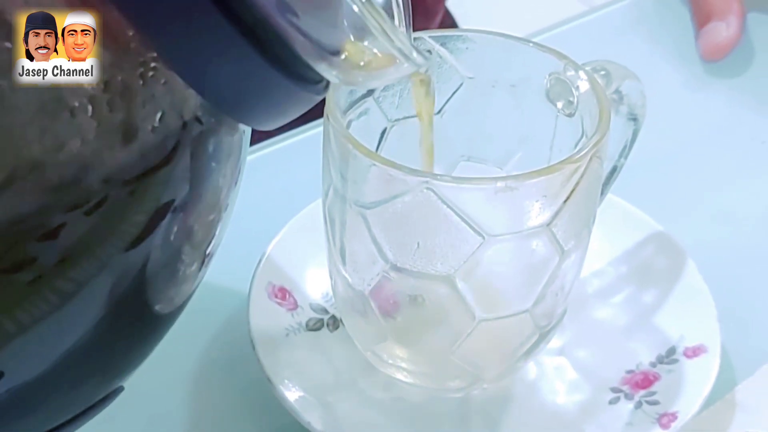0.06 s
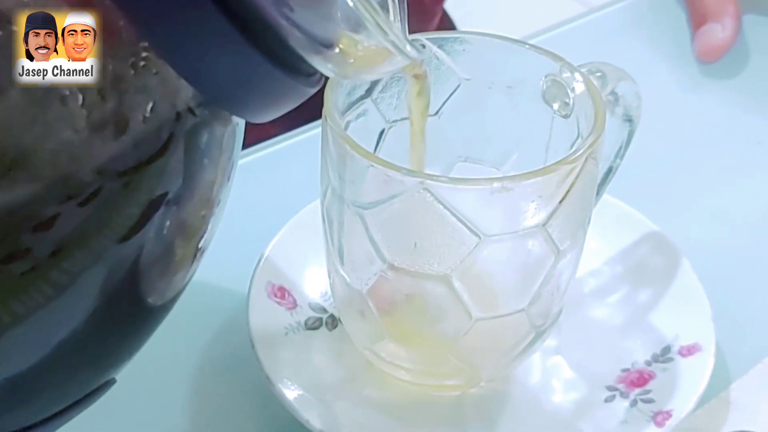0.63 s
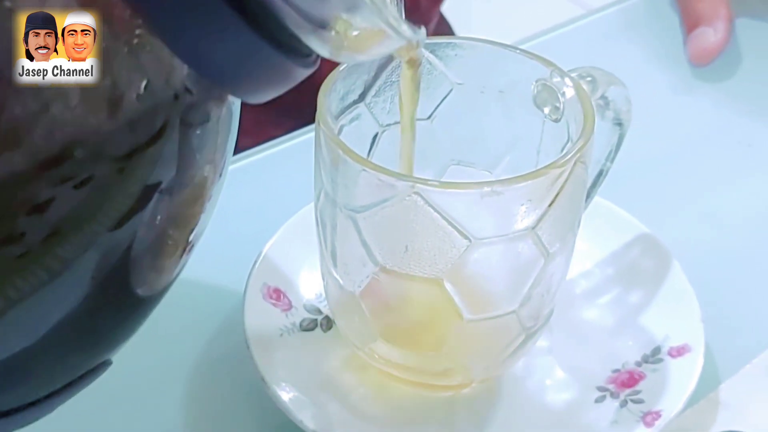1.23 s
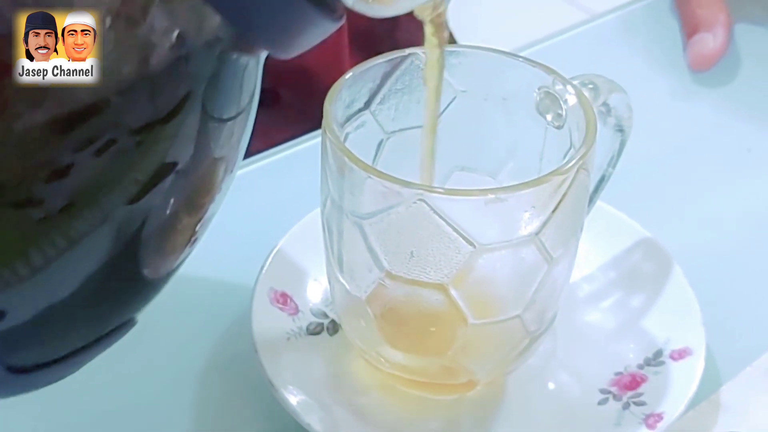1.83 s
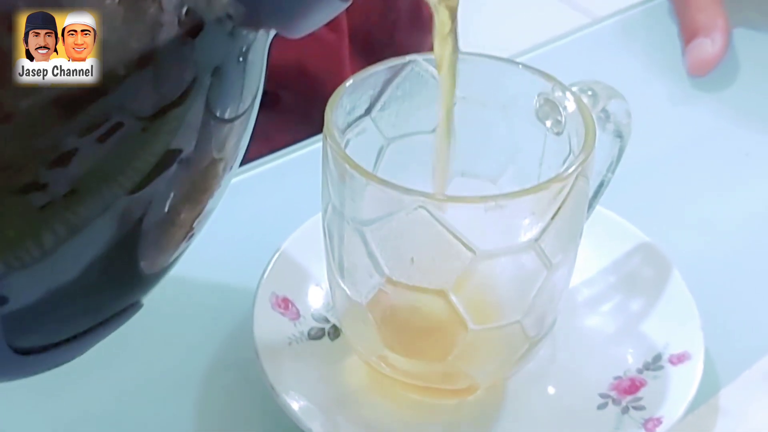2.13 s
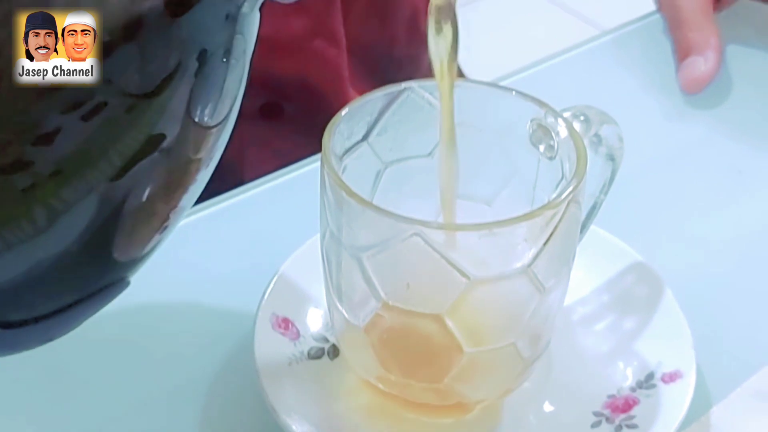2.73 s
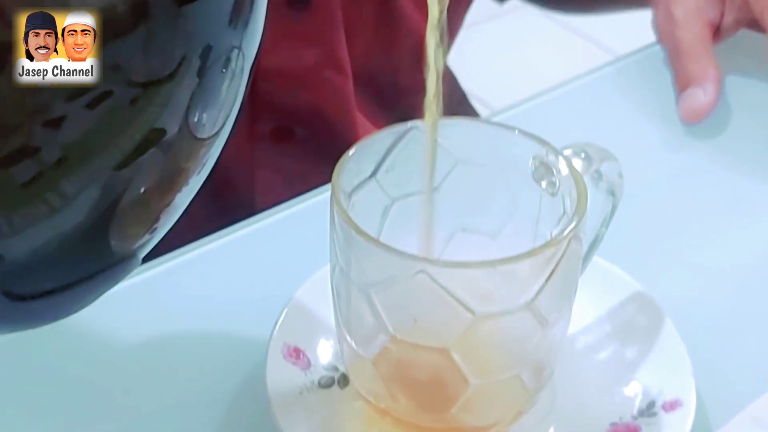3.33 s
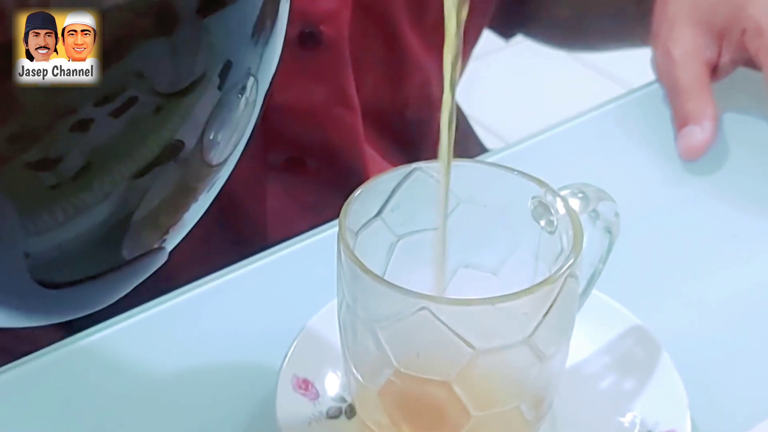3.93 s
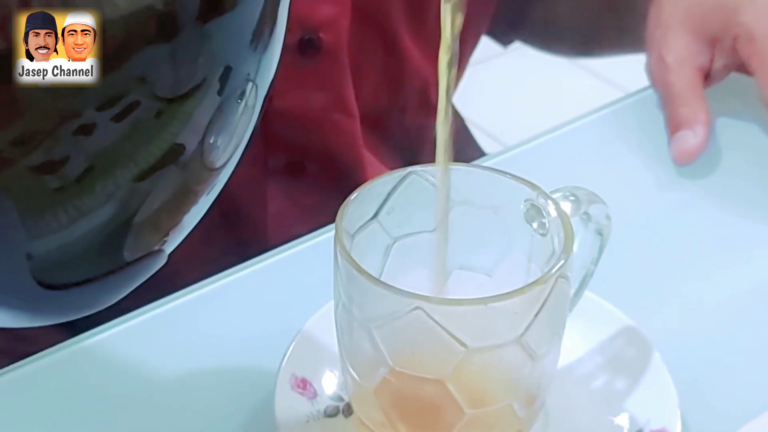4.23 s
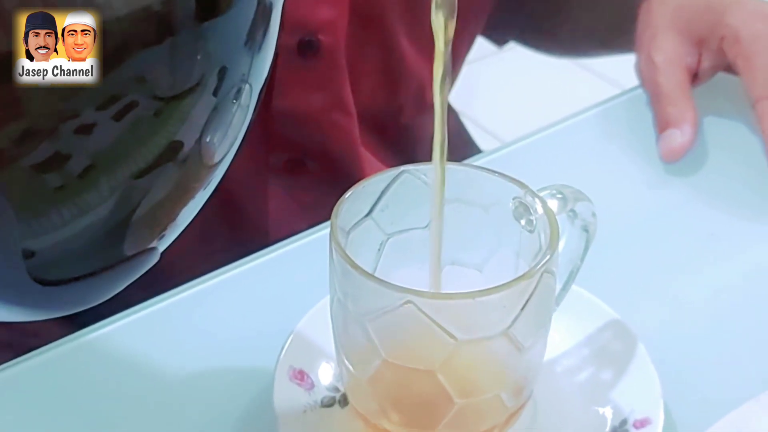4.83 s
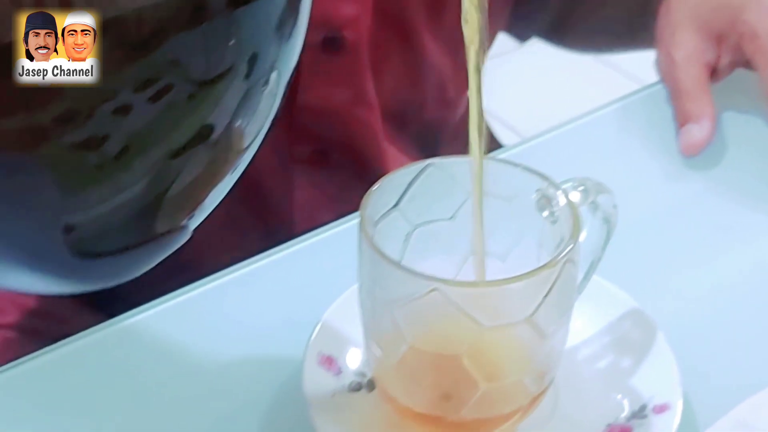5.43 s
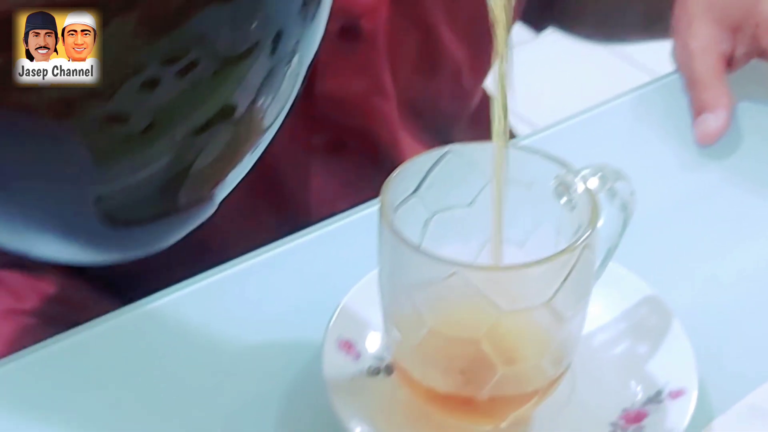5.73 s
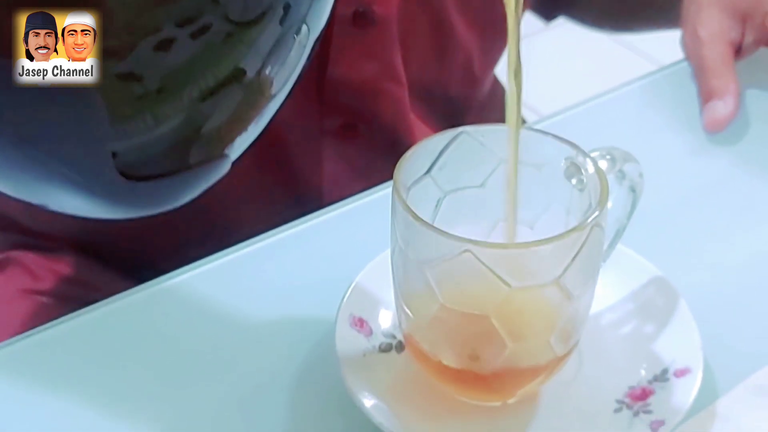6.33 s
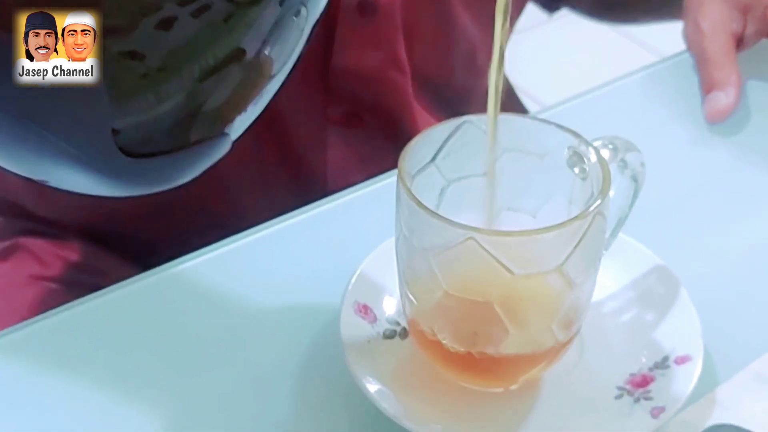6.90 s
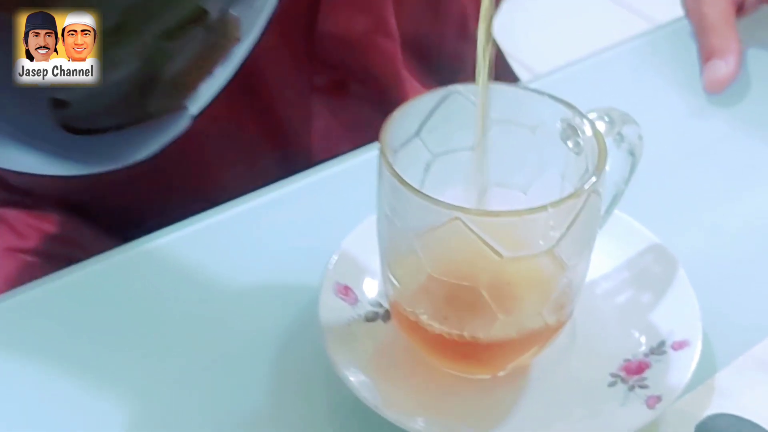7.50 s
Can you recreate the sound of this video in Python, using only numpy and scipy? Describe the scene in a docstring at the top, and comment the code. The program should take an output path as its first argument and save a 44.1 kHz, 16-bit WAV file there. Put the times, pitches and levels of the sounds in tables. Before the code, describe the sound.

A kitchen hums softly under a faint high hiss. Tea slips from a pot into a glass mug in a few faint trickles. After about two and a half seconds the thin stream plunges in harder, plopping and gurgling, a little deeper as the mug fills. Fine spray fizzes and droplets tick on the glass. The pour continues to the end, heard from close by with slight room reverberation.

```python
"""A kitchen hums and rumbles softly under a faint, high background hiss; then tea slides from a pot into
a glass mug in a few faint trickles. As the pot is lifted the thin stream plunges and entrains air. Each
bubble is a damped oscillator, its air the spring and the tea around it the mass: single ones plop, swarms
gurgle, deeper as the mug fills. Spray fizzes and flung droplets tick on the glass. Hollow resonances,
echoes and reverberation carry the pour to the two microphones of a phone close by."""
import sys
import numpy as np
from scipy import signal
from scipy.fft import rfft, irfft, next_fast_len
from scipy.io import wavfile
from scipy.ndimage import uniform_filter1d

SR = 44100
rng = np.random.default_rng(int(sys.argv[2]) if len(sys.argv) > 2 else 0)


def master_out(mix):
    """Clip the mix to full scale and print it as 16-bit PCM to the path in sys.argv[1]."""
    frames = np.transpose(np.atleast_2d(mix))
    ceiling = np.clip(frames, -1, 1)
    pcm = np.round(ceiling * 32767).astype(np.int16)
    wavfile.write(sys.argv[1], SR, pcm)


N = 337806
TIME = np.arange(N) / SR


def gain_of(db):
    """Amplitude ratio of a level in decibels."""
    return 10 ** (np.asarray(db) / 20)


def unit_rms(x):
    """Normalisation to an rms of one."""
    return x / np.sqrt(np.mean(x ** 2) + 1e-20)


def at_frequency(points, hz):
    """Interpolation of a spectrum on a logarithmic frequency axis."""
    f, value = np.transpose(points)
    return np.interp(np.log(hz + 1), np.log(f + 1), value)


def at_time(rows, s, column=1):
    """Linear interpolation of one column of a table at the times s."""
    rows = np.array(rows)
    return np.interp(s, rows[:, 0], rows[:, column])


def add(mix, s, sound):
    """Superposition: the sound joins the mix at time s."""
    part = mix[..., max(round(s * SR), 0):][..., :sound.shape[-1]]
    part += sound[..., :part.shape[-1]]


def colour(x, spectrum, size=2048):
    """Minimum-phase filtering by (f/Hz, gain/dB) points; causality keeps attacks sharp."""
    log_gain = np.log(gain_of(at_frequency(spectrum, abs(np.fft.fftfreq(size, 1 / SR)))))
    taps = np.fft.ifft(np.exp(np.conj(signal.hilbert(log_gain)))).real
    return signal.oaconvolve(x, taps)[:len(x)]


def drift(per_s):
    """Random modulation: straight lines between Gaussian values of unit variance."""
    knots = rng.standard_normal(4096)
    return np.interp(TIME * per_s, np.arange(len(knots)), knots)


# coherence of the two microphones: f/Hz, coherence (0 to 1)
COHERENCE = [(60, 1), (260, 0.67), (520, 0), (1000, 0), (2500, 0)]
def diffuse_field(length):
    """Diffuse noise is coherent at two points only for long waves; returns f/Hz and both spectra."""
    hz = np.fft.rfftfreq(length, 1 / SR)
    right, independent = rfft(rng.standard_normal((2, length)))
    shared = np.clip(at_frequency(COHERENCE, hz), 0, 1)
    left = shared * right + np.sqrt(1 - shared ** 2) * independent
    return hz, np.array([left, right])


# background noise in each channel: f/Hz, relative spectral density/dB
NOISE_LEFT = [(20, -3.5), (55, 2), (100, 6), (200, 1.5), (400, -12), (680, -13), (900, -30), (1500, -36),
              (2500, -33.5), (3600, -43), (6000, -29.5), (8500, -21), (10000, -22.5)]
NOISE_RIGHT = [(20, -28), (55, -2.5), (100, -3.5), (200, -6.5), (400, -14.5), (680, -19.5), (900, -32),
               (1500, -38), (2500, -44.5), (3600, -53.5), (6000, -41.5), (8000, -41), (10000, -53)]
# treble hiss, which dips early in the pour: t/s, relative level/dB
HISS_LEVEL = [(0, 1.5), (1.1, -1), (2.3, -1), (2.7, 0.5), (7.66, 2.5)]
def background(left_db=-62, right_db=-58.5, waver_db=2.04, treble_hz=4000):
    """Noise floor: the room's low rumble under a faint, high background hiss, wavering together."""
    hz, spectra = diffuse_field(next_fast_len(N))
    spectra = spectra * gain_of([at_frequency(NOISE_LEFT, hz), at_frequency(NOISE_RIGHT, hz)])
    rumble = irfft(spectra * (hz < treble_hz))[:, :N]
    hiss = irfft(spectra * (hz >= treble_hz))[:, :N]
    left, right = rumble + hiss * gain_of(at_time(HISS_LEVEL, TIME))
    noise = np.array([gain_of(left_db) * unit_rms(left), gain_of(right_db) * unit_rms(right)])
    return noise * gain_of(waver_db * drift(48))


# partials of an appliance's motor: f/Hz, level/dB
MOTOR_PARTIALS = [(96.9, -64.5), (145.3, -67.5), (172.3, -74), (216, -73), (269.2, -76.5), (292, -76.5),
                  (445, -80.5), (1050, -88.5)]
def motor_hum(waver_db=4, wander_rad=0.34):
    """A motor radiates a line spectrum, each line modulated at random in amplitude and phase."""
    tones = np.zeros(N)
    for hz, db in MOTOR_PARTIALS:
        amplitude = np.sqrt(2) * gain_of(db + waver_db * drift(10))
        tones += amplitude * np.sin(2 * np.pi * hz * TIME + wander_rad * drift(5.9))
    return tones


def bubble(hz, cycles, rise):
    """Damped oscillation of trapped air, decaying by 1/e in `cycles`; pitch rises near the surface."""
    turns = np.arange(int(7 * cycles / hz * SR) + 8) * hz / SR
    attack_cycles = 0.23 + 0.14 * min(cycles, 10)  # clearer bubbles start more softly
    envelope = (1 - np.exp(-turns / attack_cycles)) * np.exp(-turns / cycles)
    return envelope / envelope.max() * np.sin(2 * np.pi * turns * (1 + rise * turns / cycles))


# runs of tiny bubbles: t/s, duration/s, level/dB, f/Hz
TRICKLE_RUNS = [(0.85, 0.25, -77, 1800), (1.271, 0.28, -70.5, 718), (1.505, 0.38, -74, 880),
                (1.399, 1.23, -78.5, 2500), (1.826, 0.21, -71.5, 1570), (2.023, 0.083, -66, 577),
                (2.175, 0.22, -71, 1160), (2.436, 0.12, -65.5, 867), (2.909, 0.094, -59.5, 2570)]
def trickles(octaves=0.17, cycles=4, spread_db=6, rise=0.0049, count=60):
    """Gentle entrainment: bubbles of like size ring at like pitch, in runs that swell and fade."""
    out = np.zeros(N)
    for start, length, level_db, centre_hz in TRICKLE_RUNS:
        run = np.zeros(round(length * SR))
        for when, size, strength in rng.random((count, 3)):
            hz = centre_hz * 2 ** (octaves * (2 * size - 1))
            add(run, when * length, gain_of(spread_db * strength) * bubble(hz, cycles, rise))
        swell = np.sin(np.linspace(0, np.pi, len(run)))
        add(out, start, gain_of(level_db) * unit_rms(run * swell))
    return out


# prominent bubbles, nominal values: t/s, level/dB, f/Hz, decay/cycles, splash level/dB
PLOPS = [(1.6659, -48.5, 2560, 5.7, -61), (1.745, -45.5, 935, 1.3, -57), (1.8938, -50.5, 1590, 4.7, -51),
         (2.149, -50.5, 984, 6.7, -72), (2.4411, -37.5, 952, 4.2, -54), (2.471, -50.5, 1080, 1.9, -48),
         (2.7224, -40, 604, 1.8, -78), (2.8101, -42, 530, 6.2, -75), (2.8912, -32, 529, 4.5, -53),
         (3.035, -34.5, 680, 1.34, -53), (3.113, -31.5, 445.5, 5.7, -63), (3.1655, -33, 425, 3.1, -48.5),
         (3.226, -32, 490, 0.89, -56), (3.2612, -33, 2480, 2.9, -43), (3.291, -36.5, 507, 1.4, -70),
         (3.3051, -32, 2180, 0.97, -43), (3.3287, -20.5, 484, 1.35, -50), (3.349, -32.5, 467, 5.1, -70),
         (3.3778, -22.5, 2700, 2.7, -44), (3.4204, -27.5, 483, 2, -44), (3.4252, -40, 995, 4.5, -62),
         (3.4835, -38, 470, 2.2, -61), (3.512, -22, 527, 1.24, -40.5), (3.553, -33.5, 527, 2.7, -50),
         (3.5735, -33.5, 563, 2.8, -66), (3.6605, -30, 481, 4.3, -30), (3.7205, -32, 536, 1.7, -37.5),
         (3.77, -36.5, 475, 1.8, -54), (3.8295, -29, 438, 7, -42), (3.8812, -40, 1190, 5.8, -34),
         (3.908, -38.5, 1860, 19, -42), (3.9234, -24.5, 645, 0.55, -54), (3.945, -37, 504, 1.5, -34.5),
         (4.004, -35.5, 353, 2.5, -43.5), (4.112, -36.5, 351, 2.7, -43.5), (4.167, -30, 544, 0.83, -44.5),
         (4.203, -34.5, 354, 2.2, -57.5), (4.208, -29.5, 2600, 2.8, -47), (4.2539, -17.5, 800, 0.48, -34),
         (4.3195, -38, 1580, 15, -36.5), (4.3205, -32.5, 494, 3.3, -62), (4.351, -30, 2510, 2.5, -44),
         (4.41, -36, 304, 2, -45.5), (4.4535, -31.5, 621, 3.6, -46), (4.455, -29.5, 2160, 3.7, -58),
         (4.467, -29.5, 2160, 3.3, -61), (4.5514, -28.5, 276, 2.7, -38.5), (4.552, -28, 552, 3.8, -56),
         (4.5545, -33.5, 2300, 5.2, -55), (4.606, -39.5, 1290, 2.4, -49), (4.61, -51, 1773, 69, -72),
         (4.622, -28, 576, 1.6, -39), (4.623, -31, 318, 5, -67), (4.683, -41, 2470, 5, -60),
         (4.6992, -23, 524, 2.2, -61), (4.7255, -30.5, 510, 1.9, -61), (4.7643, -31.5, 563, 6, -57),
         (4.808, -26.5, 648, 3.2, -31.5), (4.9005, -22.5, 342, 3, -41), (4.901, -23.5, 604, 1.4, -49),
         (4.9235, -27.5, 580, 1.45, -63), (4.993, -37, 1350, 3.2, -55), (5.057, -29, 340, 4.4, -36),
         (5.0927, -39.5, 2870, 12, -41), (5.097, -34, 488, 3.9, -60), (5.116, -35, 338, 2.8, -50),
         (5.133, -32, 580, 5.4, -62), (5.137, -42, 1870, 24, -63), (5.179, -34, 820, 5, -44),
         (5.2, -37, 1040, 4.8, -37), (5.205, -43, 2860, 8, -50), (5.2467, -31, 2580, 1.3, -36.5),
         (5.2963, -29, 348, 1.9, -68), (5.3315, -28.5, 590, 3.2, -34.5), (5.3635, -25.5, 548, 1.6, -43),
         (5.435, -49, 1230, 2.3, -37), (5.4775, -38, 2480, 0.58, -36.5), (5.538, -35, 285, 2.3, -56),
         (5.636, -36, 640, 5.8, -71), (5.666, -33.5, 474, 2.3, -59), (5.705, -50, 2750, 9, -68),
         (5.7067, -34, 1057, 4.9, -63), (5.7492, -23, 584, 1.1, -43.5), (5.774, -28.5, 510, 0.98, -45),
         (6.0369, -30, 566, 1.24, -43.5), (6.1142, -25.5, 587, 3.7, -49), (6.12, -28, 358, 2.4, -61.5),
         (6.1435, -25, 440, 0.82, -57), (6.213, -33, 2650, 8.1, -68), (6.2358, -26, 286, 1.6, -42),
         (6.244, -23, 680, 2.1, -54), (6.257, -26.5, 300, 1.6, -60), (6.2875, -35.5, 660, 1.5, -39),
         (6.314, -46, 277, 1.6, -57), (6.333, -39, 2490, 1.3, -37.5), (6.399, -29.5, 700, 0.88, -58),
         (6.3993, -25, 346, 2.6, -41), (6.4062, -29.5, 2610, 5.7, -54), (6.422, -27.5, 590, 1.1, -39),
         (6.578, -37, 2700, 1.8, -40), (6.603, -31.5, 844, 0.86, -59), (6.671, -37.5, 258, 1.8, -61.5),
         (6.759, -35, 262, 1.7, -50), (6.8283, -36, 250, 3.9, -74), (6.88, -38, 625, 5.7, -48),
         (6.897, -38, 1240, 1.1, -42.5), (6.94, -35, 351, 8.4, -42.5), (7.0155, -32, 635, 10, -35.5),
         (7.04, -38, 603, 18, -63), (7.112, -33.5, 255, 3.1, -67), (7.1605, -27, 1410, 0.76, -27),
         (7.164, -24, 289, 1.54, -54), (7.2098, -25.5, 293, 2.1, -36), (7.284, -34.5, 710, 3.5, -64),
         (7.306, -32.5, 1178, 2.8, -49), (7.307, -27.5, 687, 2.6, -59), (7.3165, -33.5, 2410, 6.7, -51),
         (7.3452, -32, 1220, 2.1, -39), (7.3646, -28, 650, 1.9, -47), (7.388, -31, 247, 2.3, -57),
         (7.4383, -35.5, 2760, 7.8, -53), (7.4695, -24.5, 272, 1.7, -52), (7.541, -31.5, 638, 5.8, -66),
         (7.5713, -23.5, 670, 3.5, -32), (7.572, -28, 1260, 5.1, -54), (7.603, -33.5, 296, 2.7, -39),
         (7.629, -28.5, 580, 2.4, -51)]
# pitch of a typical large bubble, falling as the stream plunges deeper: t/s, f/Hz
PLUNGE_PITCH = [(1.3, 624), (2.7, 583), (3.2, 479), (4.2, 449), (4.7, 447), (7.66, 387.5)]
# strength of the second bubble: f/Hz of the first, relative level/dB
SECOND_LEVEL = [(300, -10), (600, -9), (1200, -16.5)]
def plops(low_db=-2.0, high_db=1, decay_scale=0.76, rise=0.011, chirp=0.026, second_delay_s=0.00819):
    """Bubble resonance: small ones ring high and chirp; the cavity under each closes on a deep second."""
    out = np.zeros(N)
    for s, db, hz, cycles, _ in PLOPS:
        smallness = at_frequency([(500, 0.0088), (1500, 1)], hz)
        glide = rise + smallness * (chirp - rise)
        first = bubble(hz / (1 + glide), decay_scale * cycles, glide)
        second = bubble(at_time(PLUNGE_PITCH, s), cycles=1.19, rise=rise)
        add(out, s, gain_of(db + low_db + smallness * (high_db - low_db)) * first)
        add(out, s + second_delay_s, gain_of(db + at_frequency(SECOND_LEVEL, hz)) * second)
    return out


# spectrum of a liquid tick: f/Hz, gain/dB
TICK_SPECTRUM = [(900, -20.5), (1800, -1), (2700, 1), (3600, -12), (4800, -5), (6200, -0.5), (8300, -13.5),
                 (10000, -28)]
# small bubbles broken off by a splash: f/Hz, level/dB re the splash, decay/cycles
FRAGMENTS = [(1158, -6.5, 1.13), (2323, -3, 2.7)]
def splashes(snap_db=-14, snap_s=0.0032, crackle_db=-3.5, crackle_s=0.012, octaves=0.19, lag_s=0.0035):
    """Cavity collapse: the surface slaps shut over each plop, snaps, crackles and sheds small bubbles."""
    snaps, crackle, pips = np.zeros((3, N))
    t = np.arange(1024) / SR
    for s, _, _, _, splash_db in PLOPS:
        noise = gain_of(splash_db) * rng.standard_normal(len(t))
        add(snaps, s, gain_of(snap_db) * noise * np.exp(-t / snap_s))
        add(crackle, s, gain_of(crackle_db) * noise * np.exp(-t / crackle_s))
        for hz, db, cycles in FRAGMENTS * 2:  # two of each kind
            size, late = rng.random(2)
            pip = bubble(hz * 2 ** (octaves * (2 * size - 1)), cycles, rise=0.036)
            add(pips, s + lag_s * late ** 2, gain_of(splash_db + db) * pip)
    crackle_band = signal.butter(4, [800, 3100], "band", fs=SR, output="sos")
    return pips + colour(snaps, TICK_SPECTRUM) + signal.sosfilt(crackle_band, crackle)


# churning, in relative levels: t/s, large bubbles/dB, smaller bubbles/dB, spray/dB
CHURN_LEVELS = [(2.4, -51, -70, -84), (2.71, -54.5, -77, -85), (3.34, -45.5, -65.5, -56.5),
                (4.05, -45, -65, -63), (4.83, -44.5, -67.5, -67), (5.26, -42, -64, -70),
                (5.51, -45.5, -63.5, -66), (6.05, -48, -68.5, -75.5), (6.27, -44, -62, -70.5),
                (6.41, -47, -66.5, -69), (6.66, -48.5, -74, -71), (6.88, -46, -67.5, -70.5),
                (7.1, -41.5, -59, -69.5), (7.66, -43.5, -63, -66)]
LARGE, SMALLER, SPRAY = 1, 2, 3
PLUNGE_START_S = CHURN_LEVELS[0][0]
def churn(column, onset_s=0.3):
    """Amplitude envelope of one kind of churning, which sets in as the stream begins to plunge."""
    onset = np.clip((TIME - PLUNGE_START_S) / onset_s, 0, 1)
    return gain_of(at_time(CHURN_LEVELS, TIME, column)) * onset


def swarm(pitch, octaves, cycles, spread_db, count, column):
    """Incoherent sum of bubbles scattered about pitch (t/s, f/Hz) by octaves (t/s, half-width/octaves)."""
    out = np.zeros(N)
    for k, (when, size, strength, life) in enumerate(rng.random((count, 4))):
        s = (k + 2 * when) / count * N / SR
        hz = at_time(pitch, s) * 2 ** (at_time(octaves, s) * (2 * size - 1))
        add(out, s, gain_of(spread_db * strength ** 3) * bubble(hz, cycles * (.5 + life), rise=0.018))
    return unit_rms(out) * churn(column)


def gurgle(large_db=-4.0, medium_db=4.5, small_db=2.5):
    """A plunging jet entrains three sizes of bubble; in shallow tea the large ones are much alike."""
    widening = [(4.15, 0.18), (4.6, 0.78)]
    large = swarm(PLUNGE_PITCH, widening, cycles=2.3, spread_db=4.5, count=700, column=LARGE)
    medium = swarm([(0, 1068)], [(0, 0.51)], cycles=2.8, spread_db=14, count=1500, column=SMALLER)
    small = swarm([(0, 2100)], [(0, .48)], cycles=3.8, spread_db=12, count=2000, column=SMALLER)
    return gain_of(large_db) * large + gain_of(medium_db) * medium + gain_of(small_db) * small


def thud(db=-12, hz=125, growth_db_per_s=2.0):
    """Forced vibration: the stream drums on the mug's base and the table, more as the tea deepens."""
    drumming = swarm([(0, hz)], [(0, 0.3)], cycles=1.32, spread_db=10.0, count=400, column=LARGE)
    return gain_of(db + growth_db_per_s * (TIME - 5)) * drumming


def spray(ping_db=-4, fizz_db=-5.0, build_s=4.4, bursts_per_s=1800):
    """Shot noise: tiny bubbles ping and burst at the surface, a fizz that grows as froth gathers."""
    pings = swarm([(0, 5800)], [(0, .35)], cycles=4, spread_db=7, count=3200, column=SPRAY)
    bursts = rng.standard_normal(N) * (rng.random(N) < bursts_per_s / SR)
    fizz = unit_rms(colour(bursts, TICK_SPECTRUM)) * churn(SPRAY)
    froth = np.clip((TIME - PLUNGE_START_S) / build_s, 0, 1)
    return froth * (gain_of(ping_db) * pings + gain_of(fizz_db) * fizz)


def surge(settle_s=0.025, exponent=0.51, lull_s=0.016, lull_depth=0.081):
    """Amplitude modulation: churning lulls as a cavity opens, then swells as the plop drags bubbles in."""
    kicks = np.zeros(N)
    for s, db, hz, _, _ in PLOPS:
        add(kicks, s, gain_of([db]) * np.sqrt(hz))
    stir = signal.lfilter([1], [1, -np.exp(-1 / (settle_s * SR))], kicks)
    # run backwards in time, the decay becomes a rise ahead of each plop
    opening = signal.lfilter([1], [1, -np.exp(-1 / (lull_s * SR))], kicks[::-1])[::-1]
    mean_stir = uniform_filter1d(stir, size=SR // 3) + 1e-3
    return (0.33 + 0.65 * stir / mean_stir) ** exponent / (1 + lull_depth * opening / mean_stir)


# droplets striking the glass: t/s, relative level/dB, brightness/dB
IMPACTS = [(2.4413, -56, 5.5), (2.987, -52.5, 7.5), (3.377, -38.5, 6), (3.742, -50.5, -12),
           (3.783, -47, -7), (3.945, -37, -14), (3.975, -41, -10), (4.005, -41.5, 3), (4.112, -44, 0),
           (4.1383, -39.5, -16), (4.1656, -45, -18), (4.204, -34, -11), (4.309, -47, -1.5),
           (4.409, -48.5, -1), (4.486, -42, -6), (4.541, -52, 4), (4.653, -50.5, 4.5), (4.899, -52, 5),
           (4.969, -52, -9), (4.991, -48.5, 4), (5.053, -51, 2), (5.0905, -49, 8.5), (5.354, -45, -0.5),
           (5.434, -45.5, -18), (5.472, -47, -11), (5.511, -48, -15), (6.244, -48.5, 6), (6.287, -51, -3),
           (6.335, -48, 7), (6.3982, -43, 7.5), (6.802, -50.5, 5), (6.872, -49, -7), (6.995, -46, -1),
           (7.079, -38, -7), (7.109, -49, 4.5), (7.1612, -41.5, 4), (7.344, -56, -4), (7.392, -49, -10),
           (7.4452, -46, -16), (7.577, -45, 2), (7.628, -41.5, 7)]
# brief ring near 2.4 and 3.1 kHz after each droplet's tick: f/Hz, level/dB, T60/s
TICK_RING = [(2444, -7, 0.051), (3107, -17, 0.035)]
# pitch of the ping, which shifts as the stream wanders in the mug: t/s, f/Hz
PING_PITCH = [(3.9, 4770), (5, 6400), (6.8, 6000), (7.1, 5150)]
def droplets(db=3, scatter_db=2.5, ping_db=2, ping_q=7, burst_s=0.0023, tail_db=-31, tail_s=0.059):
    """Impact noise: each droplet ticks with a ping and a brief ring; bright ones leave a wet hiss."""
    out, t = np.zeros((2, N)), np.arange(SR // 3) / SR
    ring = sum(gain_of(ring_db - 60 * t / t60) * np.sin(2 * np.pi * hz * t)
               for hz, ring_db, t60 in TICK_RING)
    for s, level_db, bright_db in IMPACTS:
        envelope = np.exp(-t / burst_s) + gain_of(tail_db + 2 * bright_db) * np.exp(-t / tail_s)
        resonator = signal.iirpeak(at_time(PING_PITCH, s), ping_q, fs=SR)
        pan_db = scatter_db * rng.standard_normal()
        for channel, sign in enumerate((1, -1)):
            tick = colour(rng.standard_normal(len(t)) * envelope, TICK_SPECTRUM)
            tick = colour(tick, [(6000, 0.0022), (8000, bright_db)])
            tick = tick + gain_of(ping_db) * signal.lfilter(*resonator, tick)
            impact = tick / abs(tick).max() + ring
            add(out[channel], s + 0.00089, gain_of(db + level_db + sign * pan_db) * impact)
    return out


# transmission through the mug's mouth: f/Hz, gain/dB
MOUTH_RESPONSE = [(25, -35), (60, -1.5), (110, -1), (900, 1), (1700, -4.5), (3150, -6.5), (3650, -12),
                  (4100, -0.5), (6100, -3), (6900, -6.5), (8200, 10)]
def mug_mouth(x):
    """Radiation from an opening: the mouth lets some bands out and holds others back."""
    return np.array([colour(side, MOUTH_RESPONSE) for side in x])


# hollow modes of mug, pot and table: f/Hz, gain/dB, T60/s
HOLLOW_MODES = [(129, -5.5, 0.14), (261.2, 2.5, 0.15), (333, -4.5, 0.17), (370.4, -3, 0.55),
                (451.4, -1.5, 0.16), (568.6, -8.5, 0.23), (602.6, -1, 0.18), (658, -7.5, 0.66),
                (711, -6, 0.067), (872, -5.5, 0.33), (1777, 2.5, 0.099)]
def hollows(x):
    """Sympathetic resonance: hollow bodies ring on after each plop."""
    t = np.arange(SR // 3) / SR
    response = np.zeros(len(t))
    for hz, db, t60 in HOLLOW_MODES:
        unity_peak = 2 * np.log(1000) / (t60 * SR)
        response += unity_peak * gain_of(db - 60 * t / t60) * np.cos(2 * np.pi * hz * t)
    return signal.oaconvolve(x, response[None], axes=1)[:, :N]


# echoes from near surfaces: delay/s on the right, relative level/dB
REFLECTIONS = [(.0035, -12), (.0059, -15.5), (0.0105, -14), (.020, -13), (.0244, -20.5), (0.0262, -23.5)]
def echoes(x, echo_db=-1, left_detour=1.035):
    """Early reflection: curved, cluttered surfaces scatter the treble and return a dull copy."""
    out = np.zeros((2, N))
    dull = uniform_filter1d(x, size=9, axis=1)
    for delay, db in REFLECTIONS:
        for channel, path in enumerate((left_detour, 1)):
            add(out[channel], delay * path, gain_of(db + echo_db) * dull[channel])
    return out


# reverberation time of the kitchen: f/Hz, T60/s
KITCHEN_T60 = [(200, 0.91), (600, 0.93), (2000, 2.5), (5000, 0.34), (9000, 2)]
# spectrum of its tail: f/Hz, gain/dB
KITCHEN_SPECTRUM = [(100, 15), (300, 1), (600, 6.5), (1200, -7), (3000, -8), (5000, 5.5), (9000, -3.5)]
def reverberation(x, db=-5, build_s=0.0051):
    """A diffuse field builds up, then decays exponentially at its own rate in each band."""
    noise = irfft(diffuse_field(SR)[1])
    hz, t, bands = signal.stft(noise, SR, nperseg=256)
    decay = gain_of(-60 * t / at_frequency(KITCHEN_T60, hz)[:, None])
    build = 1 - np.exp(-(t / build_s) ** 2)
    tail = signal.istft(bands * decay * build, SR, nperseg=256)[1]
    tail = np.array([colour(side / np.linalg.norm(side), KITCHEN_SPECTRUM) for side in tail])
    return gain_of(db) * signal.fftconvolve(x, tail, axes=1)[:, :N]


# shading of the left microphone: f/Hz, gain/dB re the right
LEFT_SHADOW = [(100, -5.5), (260, -0.5), (450, -1), (600, -6.5), (800, -10.5), (1100, -15), (1750, -9),
               (2300, -15.5), (3000, -12), (3500, 2.5), (4200, -9), (5300, -7.5), (10000, 1.5)]
def microphones(near, far, blocked_db=-5, right_lag_s=0.00014):
    """Acoustic shadow and path difference: the phone's body screens the left; the right is farther off."""
    screened = colour(near[0], [(550, 0.0089), (1100, blocked_db), (3000, blocked_db), (5000, 0.019)])
    left = colour(far[0] + screened, LEFT_SHADOW)
    right = np.zeros(N)
    add(right, right_lag_s, far[1] + near[1])
    return np.array([left, right])


def scene():
    """Source, path and receiver: the pour leaves the mug and reaches two microphones in the kitchen."""
    pour = trickles() + plops() + splashes() + surge() * (gurgle() + thud() + spray()) + droplets()
    direct = mug_mouth(pour)
    near = direct + hollows(direct) + echoes(direct)
    far = reverberation(near) + motor_hum()
    return microphones(near, far) + background()


def record(dry):
    """Band limiting: a linear-phase low-pass removes the highest treble."""
    cutoff_hz = 10050
    low_pass = signal.firwin(401, cutoff_hz, window=("kaiser", 8), fs=SR)
    return signal.oaconvolve(dry, low_pass[None], "same")


dry = scene()
out = record(dry)
master_out(out)
```